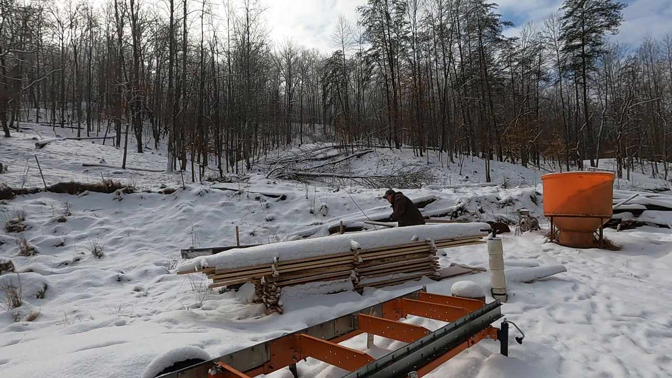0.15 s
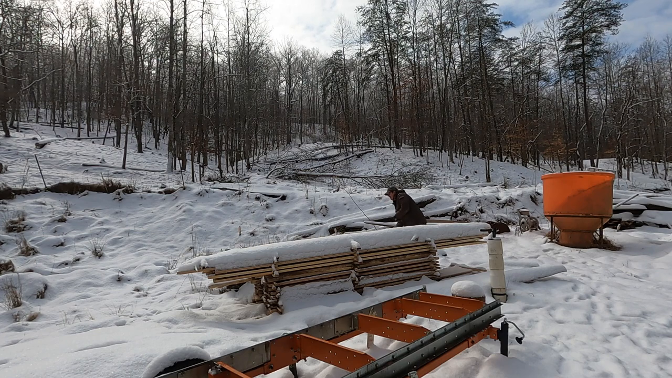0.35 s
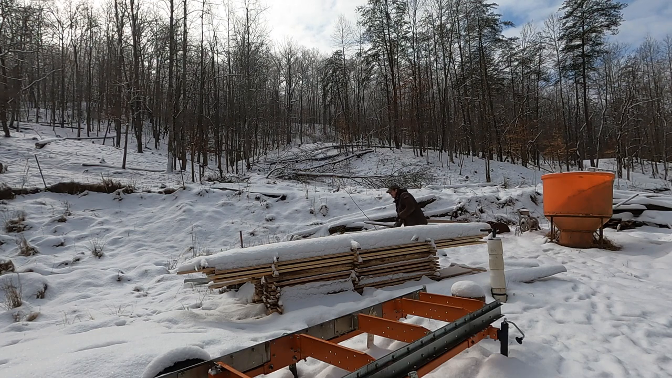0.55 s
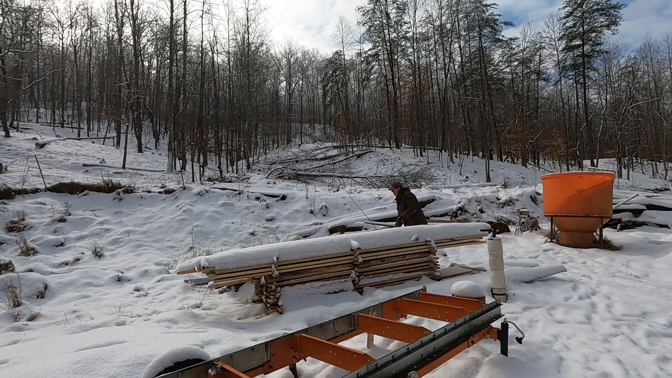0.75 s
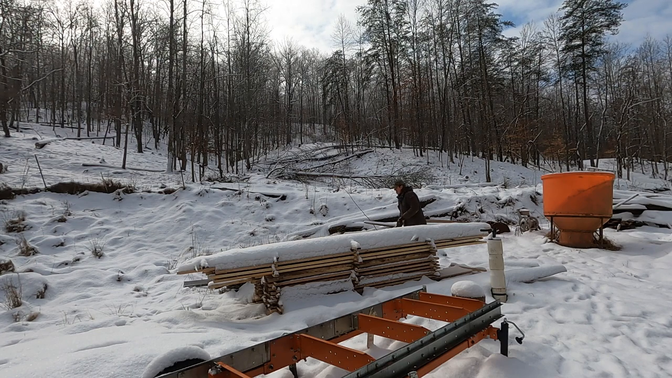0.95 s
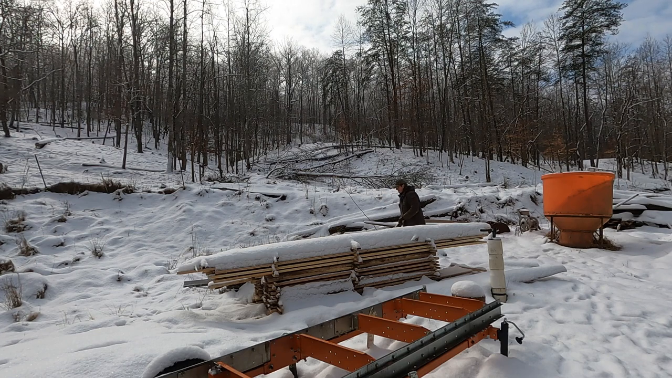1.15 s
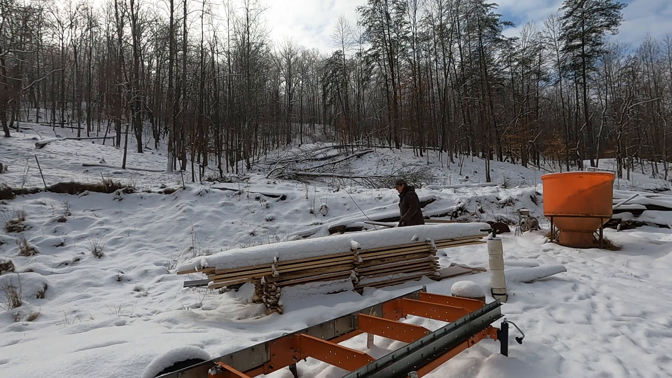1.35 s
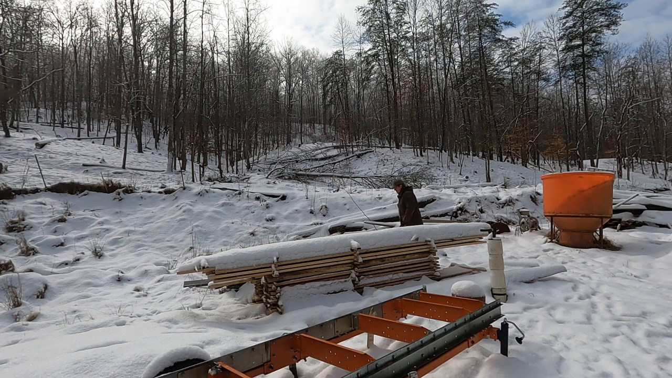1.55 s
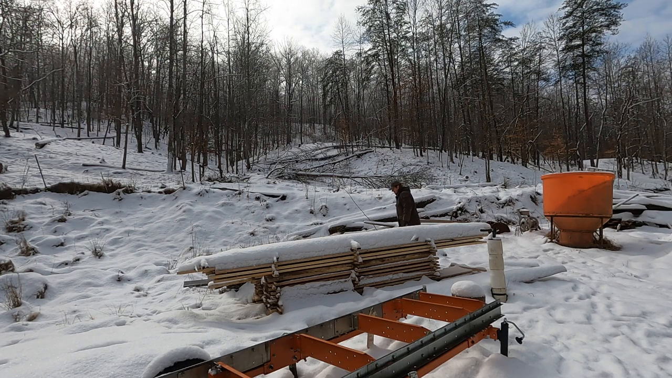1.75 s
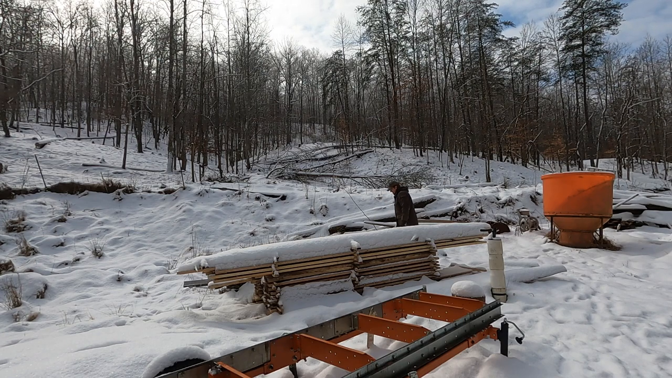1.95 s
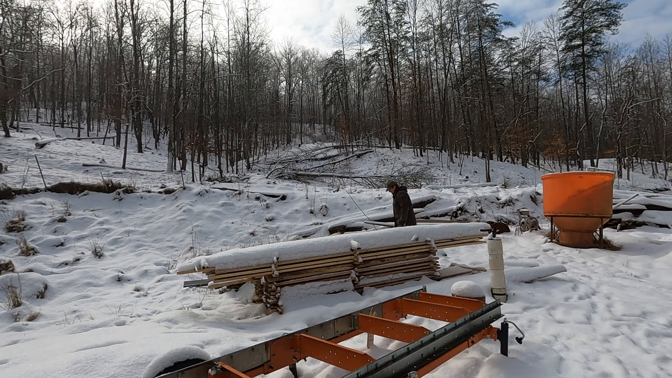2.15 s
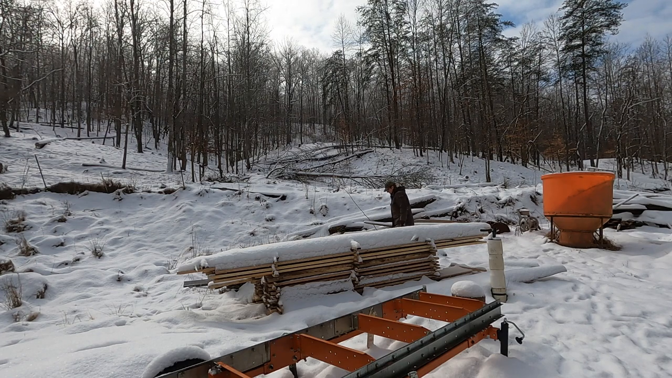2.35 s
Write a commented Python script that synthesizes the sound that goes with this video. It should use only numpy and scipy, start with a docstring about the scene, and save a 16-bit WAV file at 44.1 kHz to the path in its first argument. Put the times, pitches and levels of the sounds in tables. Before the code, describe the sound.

Rough wooden boards clatter, scrape and thud as they are pulled off a stack outdoors

```python
"""Boards off a snowy stack

Rough boards are pulled off a snowy stack some metres away, at the edge of a wood.
They drag (ringing grains and hiss), knock (struck modes), thud (low notes), tick and squeak (noise).
Loose pieces settle afterwards, over a low rumble (lumpy noise) and still winter air (steady noise).
The trees send back a soft echo of dying noise; two close microphone ports pick it all up."""
import sys
import numpy as np
from scipy import signal
from scipy.fft import rfft, irfft
from scipy.io import wavfile

SR = 44100
rng = np.random.default_rng(int(sys.argv[2]) if len(sys.argv) > 2 else 0)


def int16_out(signal):
    """Quantize to a 16-bit WAV file."""
    q = np.round(np.clip(np.atleast_2d(signal).T, -1, 1) * 32767)
    wavfile.write(sys.argv[1], SR, q.astype(np.int16))


N = 110250  # 2.5 s


def from_db(db):
    """Turn dB into gain."""
    return 10 ** (np.asarray(db) / 20)


def rms_one(x):
    """Scale to rms 1."""
    return x / np.sqrt(np.mean(x ** 2) + 1e-20)


def at_hz(points, hz):
    """Read a table on a log-frequency axis."""
    table_hz, values = np.array(points).T
    return np.interp(np.log(np.maximum(hz, 1)), np.log(table_hz), values)


def in_time(rows):
    """Draw gain curves through rows of (time_s, level_db, ...)."""
    times, *columns = np.transpose(rows)
    return [from_db(np.interp(np.arange(N) / SR, times, levels)) for levels in columns]


def band(x, low_hz, high_hz, order=2):
    """Band-pass the sound."""
    return signal.sosfilt(signal.butter(order, [low_hz, high_hz], "band", fs=SR, output="sos"), x)


def coloured(x, spectrum):
    """Filter by a table of (freq_hz, level_db)."""
    return irfft(rfft(x) * from_db(at_hz(spectrum, np.arange(N // 2 + 1) * SR / N)), N)


def dying(t60):
    """Make a quarter second of noise that falls 60 dB in t60 seconds."""
    t = np.arange(SR // 4) / SR
    return rng.standard_normal(len(t)) * from_db(-60 * t / t60)


def bright(noise):
    """Keep the treble of a contact."""
    return 0.64 * band(noise, 3400, 6900) + 0.055 * band(noise, 5700, 13000)


def ring(clicks, hz, t60):
    """Two-pole resonator: a unit click sets a dying sine of starting height 1 ringing."""
    radius = from_db(-60 / (t60 * SR))
    angle = 2 * np.pi * hz / SR
    feedback = [1, -2 * radius * np.cos(angle), radius * radius]
    return signal.lfilter([0, np.sin(angle)], feedback, clicks + 1e-18)


def add(out, s, sound):
    """Mix a sound in at time s, in seconds."""
    i = int(s * SR)
    out[..., i:i + sound.shape[-1]] += sound[..., :N - i]


GRAINS_PER_S, GRAIN_SPREAD_DB, GRAIN_CYCLES = 5000, 1.76, 34  # ring t60 in cycles of each pitch


def grains(spectrum, count):
    """Rough fibres catch at random; each catch rings briefly at one of the pitches; rms 1."""
    sizes = from_db(GRAIN_SPREAD_DB * np.minimum(rng.exponential(1, N), 5)) * rng.choice([-1, 1], N)
    clicks = sizes * (rng.random(N) < GRAINS_PER_S / SR)
    dealt = rng.integers(0, count, N)  # which pitch each catch excites
    out = np.zeros(N)
    for k, hz in enumerate(np.geomspace(spectrum[0][0], spectrum[-1][0], count)):
        voice = rms_one(ring(clicks * (dealt == k), hz, GRAIN_CYCLES / hz))
        # sqrt(hz) makes up for the wider spacing of the high pitches
        out += from_db(at_hz(spectrum, hz)) * np.sqrt(hz) * voice
    return rms_one(out)


# boards dragging and settling: time_s, mid_level_db, treble_level_db (before DRAG_DB)
DRAG_LEVELS = [(0.0, -52, -64), (0.09, -37.5, -52), (0.229, -34, -53.5), (0.238, -23.5, -33),
               (0.318, -41, -49), (0.43, -28, -49.5), (0.46, -22.5, -31.5), (0.5, -28.5, -41),
               (0.552, -37, -56.5), (0.622, -34, -52), (0.634, -26, -43.5), (0.848, -44, -67),
               (0.96, -47.5, -58), (1.19, -56, -76), (1.45, -62.5, -78), (1.8, -64, -85.5),
               (2.1, -78, -81.5)]
# colour of the wooden grains: freq_hz, relative_level_db
GRAIN_COLOUR = [(260, -30), (450, -3.5), (1000, -2.5), (1200, 0), (1730, -7.5), (2100, -8), (2290, -6.5),
                (3000, -31.5)]
# colour of the gritty hiss: freq_hz, relative_level_db
GRIT_COLOUR = [(1650, -37.5), (2800, -2), (3180, -2), (3860, -0.5), (4820, -6), (6370, -8.5), (8720, -23),
               (12700, -26.5), (14300, -42), (15400, -63.5)]
DRAG_DB = -1.08


def drag():
    """Sliding wood: ringing grains in the middle, gritty hiss on top."""
    mid_gain, treble_gain = in_time(DRAG_LEVELS)
    wood = rms_one(band(grains(GRAIN_COLOUR, count=30), 450, 2700, order=3))
    # the hiss takes a new random level every 40 samples
    roughness = from_db(3.5 * rng.standard_normal(N // 40 + 1).repeat(40)[:N])
    grit = rms_one(coloured(rng.standard_normal(N) * roughness, GRIT_COLOUR))
    return from_db(DRAG_DB) * (mid_gain * wood + treble_gain * grit)


# knocks: start_s, level_db, favoured_pitch_hz, crack_db and clatter_db (both relative to level_db),
# favour_db (lead of the modes near that pitch), ring_share (multiplies the ring times)
KNOCK_EVENTS = [(0.08, -27.5, 1007, -13, -1, 16, 2), (0.198, -20.5, 1140, -28, -15.5, 20, 0.37),
                (0.235, -15, 1770, -25, 2, 10.5, 0.85), (0.384, -17.5, 780, -17, -11.5, 10.5, 0.61),
                (0.404, -21.5, 1080, -10.5, -17, 8, 0.31), (0.419, -21, 1300, -29, 4.5, 3, 0.9),
                (0.449, -16.5, 1520, -6.5, -3.5, 6, 1.47), (0.464, -21, 1720, -11, 6, 10, 1.33),
                (0.493, -14, 702, -20.5, -2, 11, 0.7), (0.63, -13, 1177, -17.5, 0.5, 9, 0.61),
                (0.693, -24, 1220, -10.5, -9.5, 6, 1.73), (0.755, -20.5, 1204, -23, -20, 15, 1.43),
                (0.917, -36, 860, -22, 2.5, 17, 3.6), (1.2061, -30, 1080, -37, -26, 8.5, 1.22),
                (1.623, -27, 2020, -42, -16, 13, .85), (1.672, -49.5, 2008, -28.5, -15, 18.5, .45),
                (1.714, -53.5, 2000, -32.5, -7.5, 4.5, 0.74)]
# what the boards ring with: freq_hz, level_db, t60_s (before ring_share)
BOARD_MODES = [(290, -2.5, 0.05), (374, -5.5, 0.1), (557, -11.5, 0.11), (637, -11, 0.055), (716, -7, 0.095),
               (947, -2.5, 0.11), (1101, 1.5, 0.067), (1300, -6, 0.12), (1440, -12.5, 0.11),
               (1624, -10, 0.094), (1760, -7, 0.097), (2000, -2.5, 0.052), (2130, -16, 0.029),
               (2460, -5.5, 0.044)]
FAVOUR_OCTAVES, MODE_SCATTER_DB = 0.13, 2.5
TOUCHES, TOUCH_LOSS_DB, CONTACT_S = 3, 1, 0.006  # touches per knock, drop per touch, longest run
KNOCK_DB, CRACK_DB, CRACK_T60_S = -2.5, 2, 0.054
CONTACT_CUT_HZ = 2610  # soft contact dulls the ring and clatter
CLATTER_T60_S = 0.18  # before ring_share


def knocks():
    """Each knock is a quick run of touches; it rings the modes near its pitch most, clatters and cracks."""
    out = np.zeros(N)
    soft = signal.butter(12, CONTACT_CUT_HZ, fs=SR, output="sos")
    for s, db, hz, crack_db, clatter_db, favour_db, ring_share in KNOCK_EVENTS:
        when = (CONTACT_S * SR * np.r_[0, np.sort(rng.random(TOUCHES - 1))]).astype(int)
        body = from_db(clatter_db) * band(dying(CLATTER_T60_S * ring_share), 536, 3600, order=1)
        for mode_hz, mode_db, t60 in BOARD_MODES:
            octaves_off = np.log2(mode_hz / hz)
            near_db = favour_db * (np.exp(-(octaves_off / FAVOUR_OCTAVES) ** 2) - 1)
            touch_db = KNOCK_DB + mode_db + near_db - TOUCH_LOSS_DB * np.arange(TOUCHES)
            touch_db = touch_db + rng.normal(0, MODE_SCATTER_DB, TOUCHES)
            clicks = np.zeros(len(body))
            clicks[when] = from_db(touch_db) * rng.choice([-1, 1], TOUCHES)
            detuned_hz = mode_hz * (1 + 0.011 * rng.standard_normal())
            body += ring(clicks, detuned_hz, t60 * ring_share)
        crack = from_db(crack_db + CRACK_DB) * bright(dying(CRACK_T60_S))
        add(out, s, from_db(db) * (signal.sosfilt(soft, body) + crack))
    return out


# thuds of whole boards: start_s, level_db (before a fixed lift), pitch_hz, t60_s,
# rattle_db (relative to the note, before a fixed lift)
THUD_EVENTS = [(0.042, -44, 59.7, .15, -22), (0.238, -36, 78, 0.18, -2), (0.38, -8.5, 116.5, 0.076, -9),
               (0.4, -14, 65, 0.098, -6), (0.415, -17, 143, 0.089, -9), (0.446, -17.5, 96.3, 0.076, -3),
               (0.479, -20, 102, 0.093, -23), (0.552, -24.5, 62.6, 0.18, -11), (0.614, -21, 123, 0.15, -5),
               (0.652, -6.5, 122.4, 0.067, -12.5), (.69, -23.5, 58, 0.11, -9),
               (0.732, -12.5, 136, 0.081, -9), (0.778, -33, 88, 0.13, -8), (0.927, -28.5, 133, 0.18, -7),
               (.97, -38.5, 70, 0.11, -1), (1.019, -31.5, 135, 0.049, -25), (1.156, -44, 273, 0.089, 9),
               (1.206, -41, 290, 0.21, 3), (1.366, -59, 149, 0.16, 7), (1.46, -62, 146, 0.3, 4.5),
               (1.622, -46, 276, 0.076, -9), (1.622, -56, 144, 0.27, 2.5), (1.801, -56.5, 160, 0.17, -8),
               (1.834, -51.5, 156, 0.16, 2.5), (1.861, -49, 158, 0.19, 0), (1.888, -52, 70.7, 0.16, 4.5),
               (1.918, -53.5, 160, 0.066, 3.5), (1.99, -66.5, 152.3, 0.25, -0.5), (2.2, -68, 176, .1, -2),
               (2.32, -67, 45.5, 0.078, -8), (2.432, -61.5, 43.86, 0.065, -9)]
THUD_RISE_S, RATTLE_LOW_HZ, RATTLE_HIGH_HZ = 0.0058, 175, 444


def thuds():
    """A board lands flat and flexes: a low note that swells fast and dies, with a rough rattle."""
    out, t = np.zeros(N), np.arange(SR // 4) / SR
    swell = 1 - np.exp(-t / THUD_RISE_S)
    for s, db, hz, t60, rattle_db in THUD_EVENTS:
        rattle = from_db(rattle_db + 14.5) * band(dying(t60), RATTLE_LOW_HZ, RATTLE_HIGH_HZ, order=3)
        note = from_db(-60 * t / t60) * np.sin(2 * np.pi * hz * t)
        add(out, s, from_db(db + 5.5) * swell * (rattle - note))
    return out


def snap(hz, t60, broad_db):
    """A burst of dying noise: a narrow peak at hz over a broad treble."""
    noise = dying(t60)
    peak = 2.2 * band(noise, hz * .96, hz * 1.04)
    return from_db(broad_db) * bright(noise) + peak


# dry ticks and scuffs of grit and ice, plus the 2 kHz ring of the knock at 1.206 s: start_s, level_db,
# pitch_hz, t60_s, # broad_db (broad treble relative to the narrow peak)
TICK_EVENTS = [(0.087, -47, 5650, 0.058, 16.5), (0.2355, -14.5, 5090, 0.032, -19),
               (.235, -11.5, 6900, 0.012, -24), (0.242, -13.5, 4420, 0.023, -32),
               (0.929, -45, 3840, 0.056, 5), (0.95, -42.5, 3980, 0.058, 4.5),
               (0.975, -47.5, 4290, 0.068, 2.5), (1.078, -56.5, 4770, 0.08, 9.5),
               (1.124, -48, 6580, 0.02, 9), (1.208, -18, 2025, 0.022, -31), (1.234, -43, 3240, 0.04, -15),
               (1.242, -52, 6700, 0.0081, 8), (1.435, -44.5, 2390, 0.16, -17.5),
               (1.538, -66.5, 4470, 0.2, 11), (2.097, -46, 1777, 0.47, -22.5),
               (2.098, -47.5, 2090, 0.27, -3.5), (2.1, -60.5, 6250, 0.11, -8),
               (2.447, -49, 1890, .04, -12.5)]


def ticks():
    """Grit and ice give short dry snaps and scuffs of dying noise; one snap is the high ring of a knock."""
    out = np.zeros(N)
    for s, db, hz, t60, broad_db in TICK_EVENTS:
        add(out, s, from_db(db) * snap(hz, t60, broad_db))
    return out


# wood squeaks on ice: start_s, length_s, from_hz, to_hz, level_db
SQUEAK_EVENTS = [(0, 0.076, 7550, 7440, -62.5), (0.064, 0.12, 5850, 5430, -60),
                 (0.069, 0.17, 3750, 3700, -57)]
SQUEAK_WIDTH_HZ = 70  # fastest waver


def squeaks():
    """Thin wavering tones that sag as the board slows."""
    out = np.zeros(N)
    for s, length, from_hz, to_hz, db in SQUEAK_EVENTS:
        n = int(length * SR)
        waver = rms_one(band(rng.standard_normal((2, SR // 4)), 5, SQUEAK_WIDTH_HZ, order=1))[:, :n]
        phase = 2 * np.pi * np.cumsum(np.linspace(from_hz, to_hz, n)) / SR
        tone = waver[0] * np.sin(phase) + waver[1] * np.cos(phase)
        fade = np.sqrt(np.sin(np.linspace(0, np.pi, n)) + 1e-9)  # in and out
        add(out, s, from_db(db) * fade * tone)
    return out


# rumble of the shaken stack: time_s, body_level_db, deep_level_db
RUMBLE_LEVELS = [(0.0, -53.5, -56), (0.13, -43.5, -46), (0.27, -45, -42), (0.57, -34, -39),
                 (0.91, -48, -61), (1.03, -57.5, -79), (1.3, -71.5, -74.5), (2.33, -81.5, -87),
                 (2.5, -88, -93)]
# colour of the rumble's body: freq_hz, relative_level_db
BODY_COLOUR = [(100, -6.5), (144, -2), (205, -14), (360, -10), (600, -14), (780, -44)]


def rumble():
    """The stack shakes: lumpy low noise in two bands."""
    body_gain, deep_gain = in_time(RUMBLE_LEVELS)
    lumps = from_db(6.0 * rms_one(band(rng.standard_normal((2, N)), 5.8, 42, order=1)))
    body = band(coloured(rng.standard_normal(N), BODY_COLOUR), 110, 700, order=3)
    deep = band(rng.standard_normal(N), 23, 81, order=3)
    return body_gain * rms_one(lumps[0] * body) + deep_gain * rms_one(lumps[1] * deep)


# part of the wood's sound that differs left and right: freq_hz, level_db (relative to the direct sound)
SCATTER_COLOUR = [(100, -49), (300, -22), (700, -17), (1500, -13), (3000, -8), (6000, -18), (9000, -31),
                  (13000, -5)]


def scatter(wood):
    """A shifting scatter off the stack: the wood recoloured, its strength and sign wandering."""
    return coloured(wood, SCATTER_COLOUR) * rms_one(band(rng.standard_normal(N), 6, 40, order=1))


ECHO_DB, ECHO_T60_S, ECHO_DELAY_S, ECHO_LOW_HZ, ECHO_HIGH_HZ = -29, 0.8, 0.03, 800, 2500


def trees(x):
    """Scattered echo from the trunks: convolution with dying noise, partly its own in each channel."""
    t = np.arange(N) / SR
    decay = from_db(-60 * t / ECHO_T60_S) * (t > ECHO_DELAY_S)
    shared, side = rng.standard_normal((2, N)) * decay
    tail = band(shared + 0.28 * side * [[1], [-1]], ECHO_LOW_HZ, ECHO_HIGH_HZ)
    tail = tail / np.sqrt(np.sum(tail ** 2))
    return from_db(ECHO_DB) * signal.fftconvolve(x[None], tail, axes=1)[:, :N]


# still winter air: freq_hz, relative_level_db (per Hz)
AIR_COLOUR = [(35, -49.5), (60, -16.5), (119, -24.5), (164, 0.5), (264, -17.5), (340, -14.5), (827, -27),
              (1090, -9), (2470, -14), (3560, -36), (5490, -19.5), (14000, -48.5)]
AIR_DB, AIR_SIDE_DB = -70, -5.5  # rms of each noise; trim of the left-right part, relative to the shared


def winter_air():
    """Still air: two steady coloured noises, one shared and one for the left-right difference."""
    return from_db(AIR_DB) * rms_one(coloured(rng.standard_normal((2, N)), AIR_COLOUR))


def scene():
    """All the wood, its echo, the air, and a scatter that differs left and right."""
    wood = drag() + rumble() + knocks() + thuds() + ticks() + squeaks()
    air, air_side = winter_air()
    side = band(scatter(wood) + from_db(AIR_SIDE_DB) * air_side, 220, 12000)
    return wood + air + side * [[1], [-1]] + trees(wood + air)


# phase between the ports: freq_hz, left_lead_rad
PORT_LEAD = [(100, -.01), (180, -.04), (350, -.15), (700, -.38), (1400, -.6), (2700, -1.15), (3300, -1.1),
             (4100, -.55), (9000, -.25), (13000, .6)]
# level between the ports: freq_hz, left_minus_right_db
PORT_TILT = [(150, 0), (350, -.9), (700, -1.9), (1400, -.7), (8100, -.6), (14000, -2.4)]
CUTOFF_HZ = 15400  # 70 dB down from here up


def record(dry):
    """The two ports differ in phase and level by pitch; the top is cut."""
    hz = np.arange(N // 2 + 1) * SR / N
    # half the difference goes to each port
    port = np.exp(.5j * at_hz(PORT_LEAD, hz)) * from_db(.5 * at_hz(PORT_TILT, hz))
    out = irfft(rfft(dry) * [port, 1 / port], N)
    return signal.sosfilt(signal.cheby2(12, 70, CUTOFF_HZ, fs=SR, output="sos"), out)


dry = scene()
out = record(dry)
int16_out(out)
```